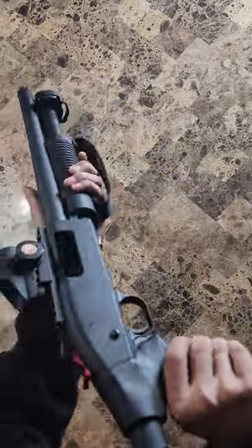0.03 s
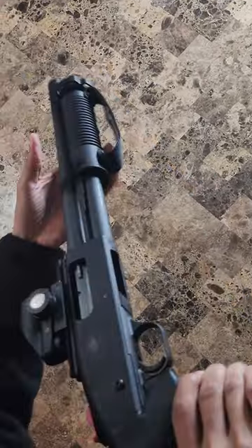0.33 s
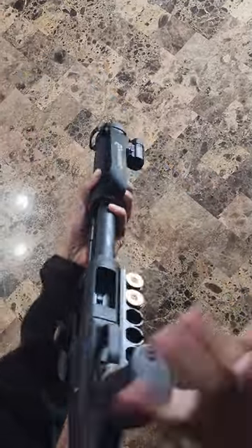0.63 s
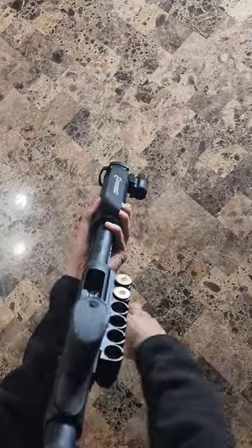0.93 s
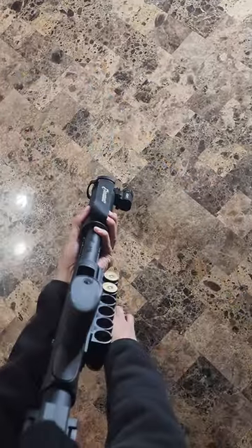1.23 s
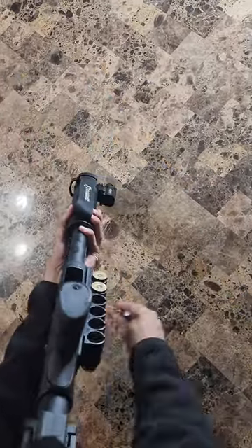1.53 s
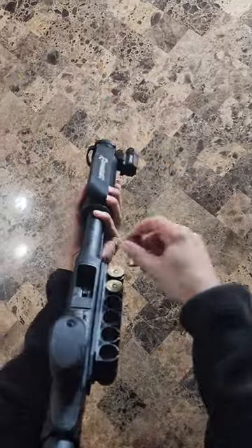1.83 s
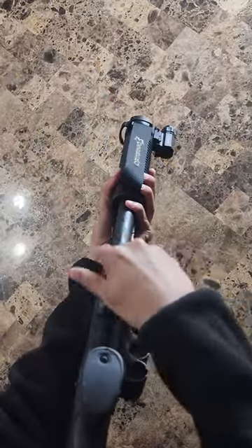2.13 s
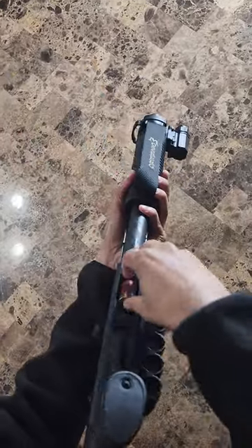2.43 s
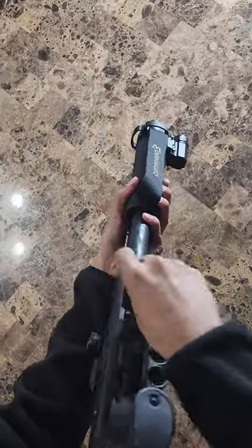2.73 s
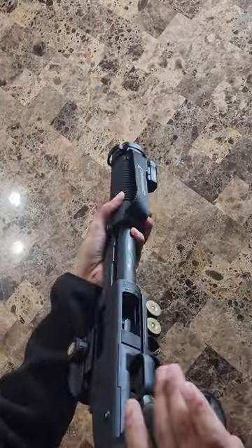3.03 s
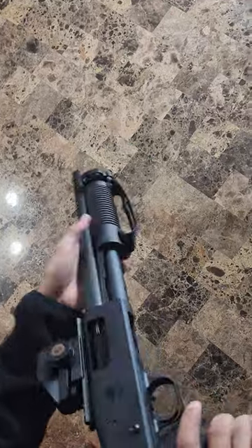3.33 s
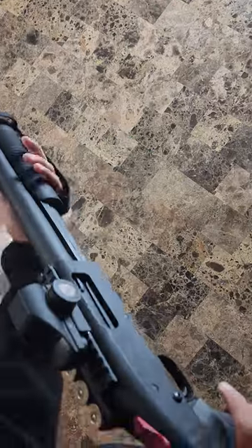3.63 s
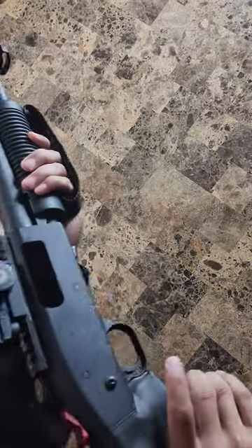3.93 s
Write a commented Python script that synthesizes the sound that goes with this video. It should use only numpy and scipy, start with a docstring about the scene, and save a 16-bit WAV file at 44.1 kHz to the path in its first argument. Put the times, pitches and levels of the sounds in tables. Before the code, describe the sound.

A pump-action shotgun is racked open, loaded with a shell and slammed shut indoors.

```python
"""First comes a sharp steel clack: a pump-action shotgun is racked open, close by in a hard-floored room.
A shell is drawn from its holder and dropped into the loading port, then the gun is slammed shut.
Each hit of steel on steel is a tiny burst of noise that makes the gun ring and the room echo.
Sliding parts scrape and the gun thuds in the hands. In between, fingers tap and sleeves rustle,
over a low appliance hum."""
import sys
import numpy as np
from scipy import signal
from scipy.fft import rfft, irfft, next_fast_len
from scipy.io import wavfile
from scipy.ndimage import map_coordinates

SR = 44100
rng = np.random.default_rng(int(sys.argv[2]) if len(sys.argv) > 2 else 0)


def unload_wav(signal):
    """Save mono or channel-first audio to the path in sys.argv[1] as 16-bit WAV at rate SR, clipped to [-1, 1]."""
    wavfile.write(
        sys.argv[1],
        SR,
        np.round(np.clip(np.atleast_2d(signal).T, -1, 1) * 32767).astype(np.int16),
    )


N = 176400
T = np.arange(N) / SR

# Steel hits of the pump. Bite is treble, sizzle is the highest treble, decay is the time to fade 60 dB.
# (time [s], level [dB], bite [dB], sizzle [dB], decay [s], note [Hz])
PUMP_HITS = [(0.0003, -0.5, 5, -9, 0.017, 1330), (0.0035, -4.5, -7, 10, 0.013, 1404),
             (0.0115, -6.5, 10, 1, 0.012, 1355), (0.0295, -16, -4, 2, 0.018, 1380),
             (0.048, -17, -14, -6, 0.027, 1370), (0.1335, -7.5, 3, 5, 0.02, 5700),
             (0.1553, -7, 5, -7, 0.017, 3900), (0.1778, -7.5, 2, -3, 0.025, 2860),
             (0.1855, -5, -2, 9.5, 0.021, 3360), (0.1878, -6.5, 10, 5, .012, 6880),
             (0.193, -2.5, -3.5, -1.5, 0.0099, 6700), (3.792, -3, -2.5, -7.5, 0.011, 4300),
             (3.7975, -8.5, 2.5, 5.5, 0.027, 5860), (3.819, -9, 9.5, -2.5, 0.025, 1740),
             (3.8288, -5.5, 7, 11, 0.0096, 4480), (3.838, -11, 6, 5, 0.031, 1750),
             (3.8435, 0, 1, -7, 0.014, 1600), (3.850, -10.5, 7, 11.5, 0.019, 4040),
             (3.8585, -4.5, 2, 2, 0.012, 1420), (3.888, -16, 6.5, 2, 0.054, 1430),
             (3.929, -20.5, 9, -17, 0.033, 1500)]
def pump():
    """Steel parts slam into each other as the gun is racked open and later shut."""
    return play_hits(PUMP_HITS, left_db=0.3, room_db=-0.5, ring_db=-2)


# Clicks of small metal parts. Lead is how much sooner the left side hears it (negative: the right side).
# (time [s], level [dB], bite [dB], sizzle [dB], decay [s], note [Hz], lead [ms])
SMALL_CLICKS = [(2.0047, -16.5, 4.5, -15.5, 0.0092, 2480, 0.54), (2.147, -15, -3, -12, 0.022, 1626, 0.04),
                (2.5443, -11.5, -3.5, -1.5, 0.012, 6360, 0.011), (2.5495, -9.5, 9, 5.5, 0.0056, 6840, 0),
                (2.5915, -10, -3, -11, 0.029, 1560, 0.6), (2.601, -16, 4.5, -3, 0.042, 1600, 0.51),
                (2.6073, -4.5, -4.5, -5, .016, 3770, 0.57), (2.6806, -24, 12.5, 8.5, 0.0087, 5600, 0),
                (2.718, -8, -1.5, -7.5, 0.011, 1650, .52), (3.4845, -23.5, -8, -15, 0.034, 1900, 0.1),
                (3.562, -20, 0.5, -1.5, 0.012, 6850, -0.51), (3.7812, -11.5, 4, 6.5, 0.021, 3970, -.5)]
def small_parts():
    """Small metal parts click close by: the shell, its lifter and other parts of the gun."""
    return play_hits(SMALL_CLICKS, left_db=0, room_db=-6, ring_db=-8.5)


# Light knocks: (time [s], level [dB], bite [dB], sizzle [dB], decay [s], note [Hz])
FINGER_TAPS = [(0.6882, -27.5, -13, -30, 0.01, 2660), (0.712, -43.5, 8, -1.5, 0.0084, 1660),
               (0.830, -41.5, -7.5, -29, 0.045, 2049), (1.3325, -40, 1, -6, 0.043, 1500),
               (3.144, -31.5, -16.5, -19, 0.013, 2360), (3.2935, -42.5, -33, -26, 0.024, 1310),
               (3.350, -40.5, 4, -11, 0.0086, 5220), (3.414, -31, -13, -24, 0.0096, 1470),
               (3.703, -35, -24.5, -24.5, 0.023, 1930), (3.7605, -32, -8, -20, 0.04, 1040)]
def fingers():
    """Fingers knock on the gun and barely make it ring."""
    return play_hits(FINGER_TAPS, left_db=1.5, room_db=-1.5, ring_db=-16)


def play_hits(rows, left_db, room_db, ring_db):
    """Each hit arrives directly, left_db louder on the left, and again as the room's echo."""
    direct, with_room = np.zeros((2, 2, N))
    for start, *settings in rows:
        hit = strike(ring_db, *settings)
        add(direct, start, hit)
        add(with_room, start, in_room(hit))
    echo = with_room - direct
    return direct * amp([[left_db / 2], [-left_db / 2]]) + amp(room_db) * echo


# Tone of a hit on steel: (frequency [Hz], level [dB])
HIT_TONE = [(100, -27.5), (400, -16.5), (750, -8), (1100, -4), (1600, 2.5), (2500, -0.5), (6800, -3.5),
            (10000, -7), (15500, -7)]
# How alike left and right are for nearby sounds: (frequency [Hz], likeness [0 to 1])
NEAR_LIKENESS = [(100, 0.65), (1600, 0.68), (5000, 0.25), (12000, .15)]
BODY_HZ, BITE_HZ, BITE_END_HZ, SIZZLE_HZ = 2050, 4640, 8100, 11900
def strike(ring_db, db, bite_db, sizzle_db, decay, note_hz, lead_ms=0):
    """One hit: the surfaces chatter for a moment, and that burst sets the gun ringing."""
    t = T[:4096]
    attack_s, chatter_db, chatter_hz = 0.00075, 3, 1485
    note_db, half_width_octaves = 7.5, 0.17
    treble = [(BODY_HZ, 0), (BITE_HZ, bite_db), (BITE_END_HZ, bite_db), (SIZZLE_HZ, sizzle_db)]
    note = lambda hz: note_db / (1 + (np.log2((hz + 1) / note_hz) / half_width_octaves) ** 2)
    burst = noise(lambda hz: curve(HIT_TONE, hz) + curve(treble, hz) + note(hz), NEAR_LIKENESS, len(t))
    shape = amp(-60 * t / decay) * (1 - np.exp(-t / attack_s))
    chatter = burst * shape * amp(chatter_db * wobble(chatter_hz, len(t)))
    # Chatter roughens the burst without adding energy.
    chatter *= burst.std() * np.linalg.norm(shape) / np.linalg.norm(chatter, axis=1, keepdims=True)
    late_side = int(lead_ms > 0)
    chatter[late_side] = np.roll(chatter[late_side], round(abs(lead_ms) * SR / 1000))
    low_cut = signal.butter(2, 55, 'high', fs=SR, output='sos')  # the hits carry no deep bass
    return amp(db) * signal.fftconvolve(signal.sosfilt(low_cut, chatter), ringing(ring_db, note_hz), axes=1)


# Ringing tones of the gun's steel body and barrel: (pitch [Hz], strength relative to ring_db [dB], decay [s])
GUN_TONES = [(1028, 2.5, 0.26), (1414, 11, 0.1), (1540, 7, 0.2), (1685, 2, 0.1), (2077, 3, 0.1),
             (2640, 5.5, 0.28), (3410, 11, 0.51), (3520, 9.5, 0.46), (6600, 11, 0.26)]
def ringing(ring_db, note_hz):
    """The gun's tones and the struck part's own note ring on; loose parts blur each pitch."""
    t = T[:SR // 3]
    note_db, note_decay = 4, 0.08
    blur_cycles, blur_hz = 0.13, 70
    ring = np.zeros((2, len(t)))
    for hz, db, decay in GUN_TONES + [(note_hz, note_db, note_decay)]:
        cycles = hz * t + rng.random((2, 1)) + blur_cycles * wobble(blur_hz, len(t))
        scale = 2 * np.log(1000) / (decay * SR)  # same boost at this pitch however long it rings
        ring += scale * amp(ring_db + db - 60 * t / decay) * np.cos(2 * np.pi * cycles)
    ring[:, 0] += 1  # lets the hit itself through
    return ring


# Tone of a thud: (frequency [Hz], level [dB])
THUD_TONE = [(25, 2.5), (85, -6), (165, -0.5), (250, -10), (600, -17), (2500, -56.5)]
# The gun jolting in the hands: (time [s], level [dB], decay [s], bass [dB])
JOLTS = [(0.0005, -32.5, 0.15, -10.5), (0.181, -36, 0.019, -2), (0.187, -20, 0.041, -2.5),
         (0.1937, -35.5, 0.074, 8.5), (0.69, -40, 0.012, -33), (2.147, -47.5, 0.089, -44),
         (2.608, -27.5, 0.04, -12), (3.839, -40, 0.13, 9), (3.886, -33, 0.13, -1)]
def thuds():
    """The whole gun gets a dull push when a moving part reaches its stop."""
    out, t = np.zeros((2, N)), T[:SR // 4]
    attack_s, room_db = 0.001, -6
    for start, db, decay, bass_db in JOLTS:
        bass = [(130, bass_db), (350, 0)]
        push = noise(lambda hz: curve(THUD_TONE, hz) + curve(bass, hz), likeness=[(100, 0.5)], size=len(t))
        shape = amp(-60 * t / decay) * (1 - np.exp(-t / attack_s))
        add(out, start, amp(db) * normalize(push * shape) * np.sqrt(np.mean(shape ** 2)))
    echo = in_room(out)[:, :N] - out
    return out + amp(room_db) * echo


# Tone of scraping metal: (frequency [Hz], level [dB])
SCRAPE_TONE = [(100, -7.5), (500, -8), (900, -2), (1550, 0.5), (7000, -6.5), (11000, -12)]
# Sliding strokes: (start [s], rise [s], fall [s], relative level [dB], sizzle [dB])
METAL_STROKES = [(0.125, 0.052, 0.041, -20.5, 12.5), (1.308, 0.029, 0.48, -52, -7.5),
                 (2.538, 0.032, 0.2, -34.5, -2), (3.785, 0.064, 0.22, -22, 6.5)]
def scrapes():
    """Metal slides on metal with a gritty hiss."""
    return rubbing(METAL_STROKES, SCRAPE_TONE, grain_db=6, grain_hz=614.4)


# Tone of rubbed cloth: (frequency [Hz], level [dB])
CLOTH_TONE = [(100, -7), (1500, 2), (7500, -4), (10000, -15.5), (16000, -27)]
# Brushing strokes: (start [s], rise [s], fall [s], relative level [dB], sizzle [dB])
CLOTH_STROKES = [(0.57, 0.081, 0.13, -63, -14), (1.58, 0.11, 0.46, -66, 3),
                 (1.765, 0.0104, 0.041, -61.5, 10), (3.11, 0.048, 0.8, -66, 3.5),
                 (3.205, 0.013, 0.058, -54, 22.5), (3.54, 0.043, 0.27, -53, -26)]
def rustles():
    """Sleeves and palms brush softly as the hands move."""
    return rubbing(CLOTH_STROKES, CLOTH_TONE, grain_db=4.5, grain_hz=503)


def rubbing(rows, tone, grain_db, grain_hz):
    """Rubbing makes a grainy hiss that swells, then fades by 30 dB over its fall time."""
    out, t = np.zeros((2, N)), T[:SR]
    trim_db = -3.5
    for start, rise, fall, db, sizzle_db in rows:
        sizzle = [(BITE_HZ, 0), (SIZZLE_HZ, sizzle_db)]
        hiss = noise(lambda hz: curve(tone, hz) + curve(sizzle, hz), NEAR_LIKENESS, len(t))
        grain = amp(grain_db * wobble(grain_hz, len(t)))
        stroke = np.minimum(t / rise, 1) ** 2 * amp(-30 * np.maximum(t - rise, 0) / fall)
        add(out, start, amp(db + trim_db) * stroke * normalize(hiss * grain))
    return in_room(out)[:, :N]


# Tone of the room's echo: (frequency [Hz], level [dB])
ECHO_TONE = [(100, -15.5), (500, -0.5), (1500, -1.5), (4000, 0), (8000, 2.5), (16000, -0.5)]
# How long the main echo lasts: (frequency [Hz], decay [s])
ECHO_DECAY = [(100, 0.85), (500, 0.49), (3500, 0.55), (7500, 0.47), (16000, 0.2)]
# How alike left and right are for the room's sound: (frequency [Hz], likeness [0 to 1])
ROOM_LIKENESS = [(100, 0.54), (400, 0.96), (1500, 0.11)]
def in_room(x):
    """A sound plus its echo: quick first bounces, a main tail and a faint slow one. Treble dies first."""
    size, gap_s = SR * 3 // 4, 0.0034
    wash = noise(lambda hz: curve(ECHO_TONE, hz), ROOM_LIKENESS, size)
    hz, t, bands = signal.stft(wash, SR, nperseg=256)
    fade = lambda decay: amp(-60 * t / decay) * np.sqrt(2 * np.log(1000) / (decay * SR))
    main_decay = curve(ECHO_DECAY, hz)[:, None]
    early = amp(2) * fade(decay=0.082)
    late = amp(-13.5) * fade(decay=1.9 * main_decay)
    shape = np.sqrt(early ** 2 + fade(main_decay) ** 2 + late ** 2)
    echo = signal.istft(bands * shape, SR, nperseg=256)[1][:, :size]
    echo *= np.clip(T[:size] / gap_s - 0.5, 0, 1)  # a short wait before the first bounce
    echo[:, 0] = 1  # lets the direct sound through
    return signal.fftconvolve(x, echo, axes=1)


# Tone of the moving arm: (frequency [Hz], level [dB])
ARM_TONE = [(30, -10), (110, 1.5), (400, 0.5), (800, -15), (3000, -52)]
# Its rise and fall in loudness: (time [s], level [dB])
ARM_LEVELS = [(1.05, -81.5), (1.17, -79), (1.38, -61.5), (1.53, -59.5), (1.63, -75.5), (3.1, -71.5),
              (3.6, -67), (4, -59.5)]
def arm():
    """The moving arm makes a soft, low flutter."""
    level_db = np.interp(T, *np.transpose(ARM_LEVELS)) + 1.8 * wobble(rate_hz=20, size=N)
    return amp(level_db) * normalize(noise(lambda hz: curve(ARM_TONE, hz), NEAR_LIKENESS, N))


# The appliance's two tones: (pitch [Hz], level [dB])
HUM_TONES = [(56.4, -57), (112.8, -76)]
def hum():
    """An appliance hums low, its loudness wavering very slightly."""
    tones = sum(np.sqrt(2) * amp(db) * np.sin(2 * np.pi * (hz * T + rng.random())) for hz, db in HUM_TONES)
    return tones * amp(0.13 * wobble(rate_hz=3.3, size=N))


# Tone of the quiet room: (frequency [Hz], level [dB])
AIR_TONE = [(25, -5.5), (60, 1), (250, -9), (1000, -19.5), (8000, -31), (10000, -37), (16000, -43.5)]
def air():
    """The room's still air is a faint, steady, deep hush."""
    return amp(-69.5) * normalize(noise(lambda hz: curve(AIR_TONE, hz), ROOM_LIKENESS, N))


def amp(db):
    """Turn decibels into a volume multiplier."""
    return 10 ** (np.asarray(db) / 20)


def normalize(x):
    """Scale a sound to an average power of 1."""
    return x / np.sqrt(np.mean(x ** 2) + 1e-20)


def curve(points, hz):
    """Read between (frequency, value) points, with octaves evenly spaced."""
    freqs, values = np.transpose(points)
    return np.interp(np.log(hz + 1), np.log(freqs + 1), values)


def noise(tone_db, likeness, size):
    """Stereo noise with a given tone; likeness sets how much left and right share."""
    padded = next_fast_len(size + 2048)
    hz = np.fft.rfftfreq(padded, 1 / SR)
    spread = np.arccos(np.clip(curve(likeness, hz), -1, 1)) / 2
    white = rfft(rng.standard_normal((2, size)), padded)
    gains = amp(tone_db(hz)) * [np.cos(spread), np.sin(spread)]
    shared, side = irfft(white * gains, padded)[:, :size]
    return np.array([shared + side, shared - side])


def wobble(rate_hz, size):
    """A smooth curve through rate_hz random points a second."""
    points = rng.standard_normal(int(size * rate_hz / SR) + 4)
    return map_coordinates(points, [np.arange(size) * rate_hz / SR])


def add(track, start, x):
    """Mix x into the track at a start time in seconds."""
    i = max(0, round(start * SR))
    track[:, i:i + x.shape[1]] += x[:, :max(0, N - i)]


def scene():
    """The gun handling, slightly to the left, over the thuds and the quiet background."""
    handling = pump() + small_parts() + fingers() + scrapes() + rustles()
    return handling * amp([[0.4], [-0.4]]) + thuds() + hum() + air() + arm()


def record(dry):
    """Clip the loudest peaks, then remove the very highest treble."""
    top_hz = 16700
    high_cut = signal.cheby2(14, 70, top_hz, fs=SR, output='sos')
    return signal.sosfilt(high_cut, np.clip(dry, -1, 1))


dry = scene()
out = record(dry)
unload_wav(out)
```